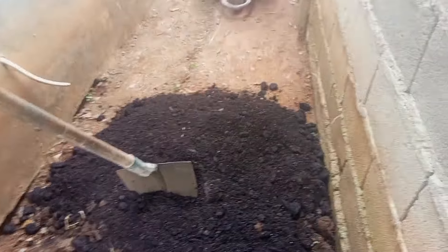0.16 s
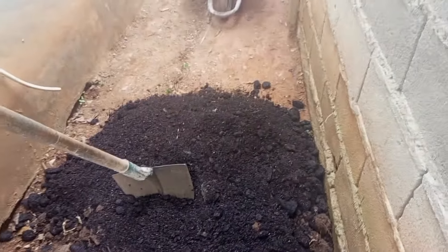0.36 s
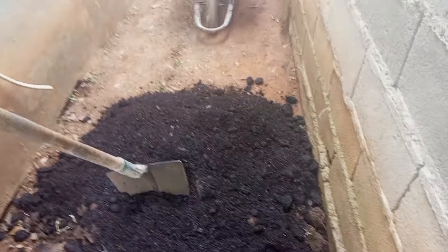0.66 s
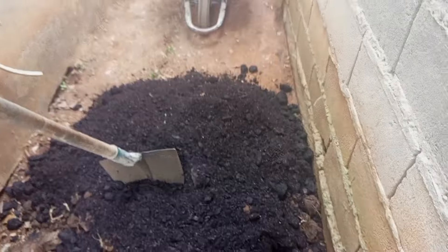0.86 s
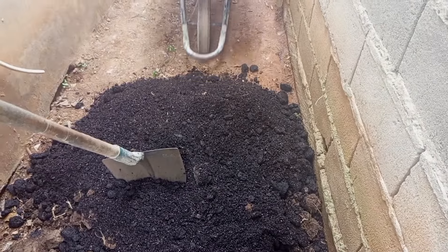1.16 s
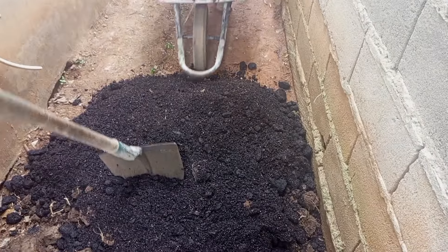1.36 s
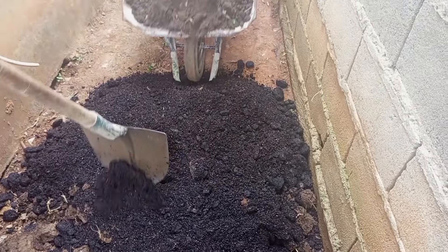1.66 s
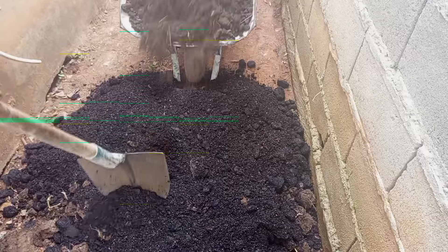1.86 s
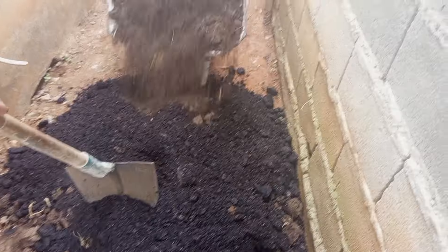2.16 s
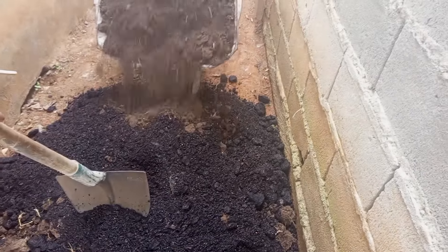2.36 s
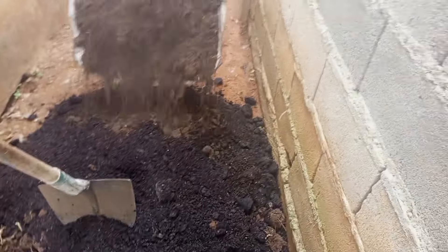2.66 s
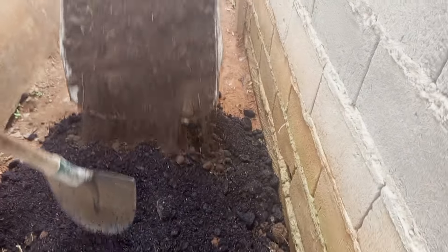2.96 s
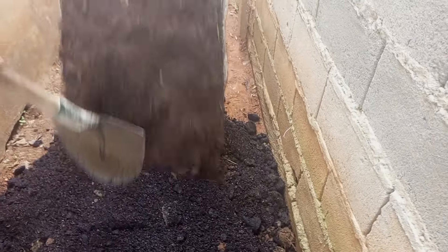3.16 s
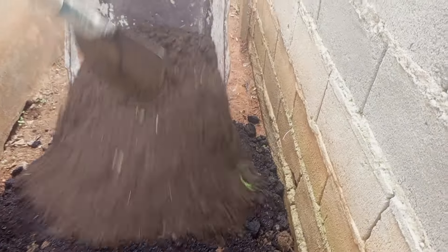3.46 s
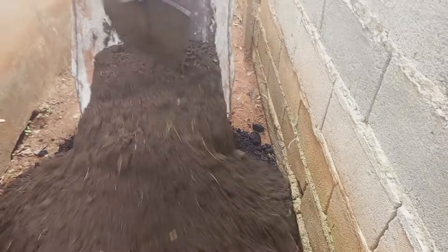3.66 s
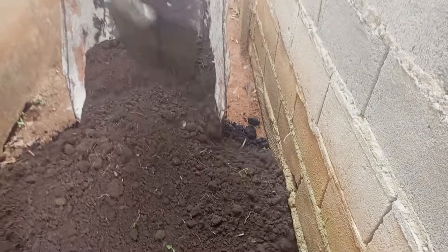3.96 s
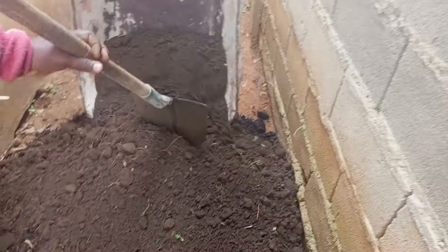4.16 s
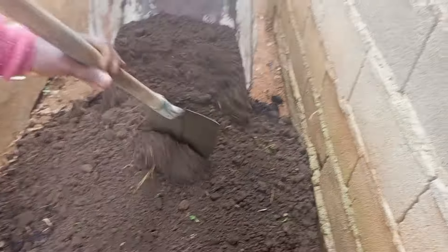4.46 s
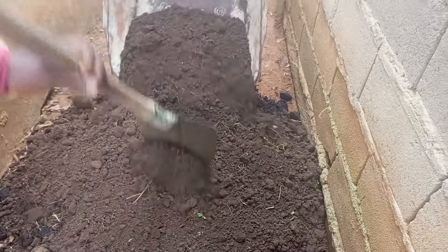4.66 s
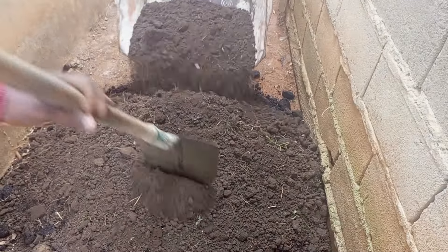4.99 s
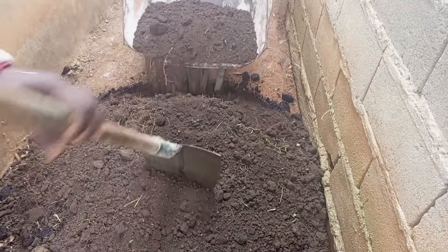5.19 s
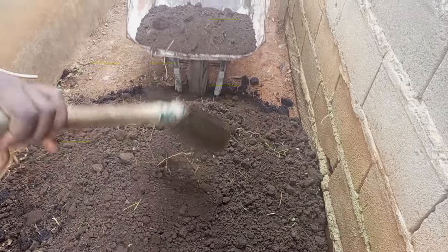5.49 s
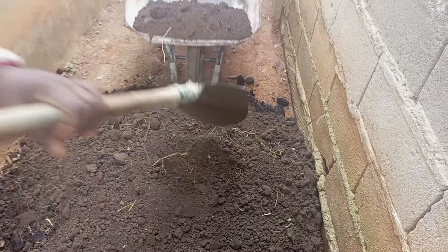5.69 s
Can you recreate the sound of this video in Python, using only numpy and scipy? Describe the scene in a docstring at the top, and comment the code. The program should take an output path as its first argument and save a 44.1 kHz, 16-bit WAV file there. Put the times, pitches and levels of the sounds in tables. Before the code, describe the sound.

In a walled outdoor passage, a wheelbarrow approaches with faint scuffs and creaks while a small bird repeats a quick falling chirp. A little soil trickles, then the load slides out in a loud, thudding, gritty rush. A shovel blade rasps and rings through earth in several strokes, the barrow drops on its legs with a booming clank, and two last scrapes follow. Close, slightly thin microphone with short wall echoes.

```python
"""A walled outdoor passage: a wheelbarrow is pushed up and tips its soil onto a heap; a shovel rakes the rest out.
Soil is shaped noise made of many tiny impacts; the steel blade and frame are resonators that such grains excite.
The barrow drops back on its legs with a clank, and its tray booms as a set of decaying sines.
A small bird repeats one falling chirp of gliding near-sine notes, among other bird notes and thin squeaks.
Grainy noise forms the outdoor hush, and short echoes come off the walls and ground."""
import sys
import numpy as np
from scipy import signal
from scipy.fft import rfft, irfft, next_fast_len
from scipy.io import wavfile

SR = 44100
rng = np.random.default_rng(int(sys.argv[2]) if len(sys.argv) > 2 else 0)


def persist_wave(psi):
    """Save psi, clipped to +-1, as 16-bit WAV."""
    counts = np.round(np.clip(psi, -1, 1) * 32767).astype(np.int16)
    wavfile.write(sys.argv[1], SR, np.atleast_2d(counts).T)


N = 257103
TIME = np.arange(N) / SR

# slides of soil: (time [s], swell [s], hold [s], fade t60 [s], flow level [dB],
# thud of the landing mass [dB], fizz of fine crumbs [dB])
SOIL_SLIDES = [(1.579, 0.042, 0.011, 0.17, -46, -48.5, -46.5),
               (1.628, 0.068, 0.015, 0.27, -36.5, -42.5, -37), (2.737, 0.3, 0.073, 0.64, -19, -18.5, -19.5),
               (3.164, .12, 0.025, 0.38, -29.5, -31, -54), (3.334, 0.064, .015, 0.073, -62, -35, -64),
               (3.913, .07, 0.26, 1, -35, -36, -43.5)]
# fines that trickle on after a slide: (time [s], hold [s], level [dB])
FINE_TRICKLES = [(1.834, 0.1, -48), (3.461, 0.018, -40.5), (3.564, 0.11, -46)]
# spectra of the flow, thud and fizz of soil: (frequency [Hz], density [dB per Hz])
FLOW_SPECTRUM = [(200, -31), (500, -12.5), (780, -2), (1150, -2.5), (1800, -1.5), (2800, -3.5), (4100, -15),
                 (5000, -12.5), (8000, -35), (16000, -61)]
THUD_SPECTRUM = [(30, -36), (80, -28), (105, -12), (135, -5.5), (170, -10), (192, -1), (235, -7), (278, 0),
                 (330, -11), (430, -11), (900, -17), (4000, -74)]
FIZZ_SPECTRUM = [(1000, -15), (3000, -8), (4100, 2), (5000, -6), (6300, 2), (8000, -9), (9800, -5),
                 (12000, -14.5), (13500, -21), (15300, -6)]
# spectrum of loose clods and pebbles that land on their own: (frequency [Hz], density [dB per Hz])
CLOD_SPECTRUM = [(120, -3), (300, -24), (520, 9), (1000, -28), (1900, 15.5), (4000, 9), (7000, -36),
                 (11000, -49), (15500, -49)]
# shovel strokes: (time [s], rise [s], hold [s], blade ring [dB], grit [dB], soil thud [dB])
SHOVEL_STROKES = [(3.88, 0.015, .012, -26.5, -30, -46), (3.899, 0.0012, 0.031, -18.5, -18, -32),
                  (4.196, 0.043, 0.024, -28.5, -28.5, -40), (4.44, 0.0035, 0.017, -35.5, -34.5, -47),
                  (4.474, 0.019, 0.015, -24.5, -25, -40.5), (4.507, 0.011, 0.037, -31, -30, -43.5),
                  (4.588, 0.023, 0.061, -47, -45, -82), (4.634, .003, 0.0047, -53, -33.5, -78),
                  (4.755, 0.058, 0.028, -35, -33, -58), (5.057, .02, 0.044, -46, -41.5, -50),
                  (5.544, 0.0069, 0.019, -19, -36, -59), (5.55, 0.031, 0.04, -28.5, -21.5, -47.5),
                  (5.61, 0.025, .11, -33, -57, -80), (5.745, 0.04, 0.046, -31.5, -30.5, -80)]
# resonances of the blade damped by soil: (frequency [Hz], width [Hz], level [dB])
BLADE_MODES = [(750, 88, -5), (1377, 303, -0.5), (1513, 32, 10), (1649, 73, 0.5), (1877, 260, -2.5),
               (2134, 34, 8), (2405, 190, -1.5), (2933, 170, -1), (3620, 480, -18.5), (4180, 130, -12),
               (5950, 590, -11.5), (6130, 1800, -63.5)]
# spectrum of grit rasping on steel: (frequency [Hz], density [dB per Hz])
GRIT_SPECTRUM = [(600, -25), (2000, -8), (4000, -2), (5000, -5), (6200, 2), (7900, -5), (9300, 1),
                 (11000, -1.5), (13300, -10), (15400, -1)]
# legs and frame striking the ground: (time [s], clank [dB], tray boom [dB])
LEG_STRIKES = [(5.232, -28, -34.5), (5.255, -16, -20.5), (5.261, -16.5, -24), (5.269, -18, -52)]
# resonances of the steel frame: (frequency [Hz], width [Hz], level [dB])
FRAME_MODES = [(790, 1200, -6.5), (1700, 120, 10), (2196, 110, 14), (2650, 250, 7.5), (3200, 470, 4),
               (3900, 220, 5.5), (4510, 280, 2), (5500, 340, 5.5), (8670, 830, 0), (10400, 1700, -15)]
# modes of the sheet-metal tray: (settled frequency [Hz], level within the boom [dB], t60 [s])
TRAY_MODES = [(81.1, -22, 0.77), (106, -4, 0.1495), (147, -12.5, 0.82), (163, -10.5, 0.7), (208, -9, 0.77),
              (243, -3.5, 0.076), (307.5, -4.5, 0.3), (364, -21, 0.039), (461, -10, 0.2), (643, -20, 0.39),
              (710, -28, 0.4), (803, -21, 0.34)]
# the tray flexing as its load leaves it:
# (time [s], length [s], start pitch [Hz], end pitch [Hz], level [dB], waver [share of pitch])
TRAY_FLEXES = [(5.08, 0.16, 143, 86.5, -42.5, 0.16), (5.12, 0.09, 240, 195, -51.5, 0.027),
               (5.3, 0.11, 794, 660, -51.5, 0.017)]
# scuffs and creaks as the barrow is pushed and tipped: (time [s], level [dB], t60 [s],
# resonance [Hz], sharpness Q [-], scratch against the resonance [dB])
BARROW_JOLTS = [(0.0, -54.5, .24, 151, 3.4, 0), (.365, -50, 0.24, 2780, 1, -10),
                (.565, -58.5, 0.36, 960, 1.5, 3), (1.107, -41, 0.24, 1550, 3.4, -5),
                (1.13, -37.5, .1, 960, 3.6, -0.5), (1.16, -60, 0.54, 90, 2.6, 9.5),
                (1.532, -49.5, 0.21, 980, 1.4, 5), (1.61, -55, 0.3, 1580, 1.2, 5),
                (1.688, -39, 0.075, 1510, 2.2, -16), (1.849, -54, 0.3, 1910, 0.69, 6.5),
                (2.318, -45.5, 0.3, 960, 3.3, 0), (2.336, -42.5, 0.051, 2120, 17, 3),
                (2.38, -50.5, 0.49, 830, 11, -2), (2.445, -51, 0.18, 836, 13, 2),
                (2.47, -49, 0.092, 1117, 16, 6), (2.59, -45.5, 0.11, 1860, 9, -11),
                (2.598, -49, .11, 3280, 8.5, -6), (2.755, -46.5, 0.3, 735, 3.5, -2),
                (5.055, -48, 0.42, 800, 1.7, -16), (5.078, -44, 0.43, 1610, 2.5, -11)]
# spectrum of the dull scratch: (frequency [Hz], density [dB per Hz])
SCRATCH_SPECTRUM = [(150, -20), (450, -20), (750, -3), (2000, 0), (4200, -8), (8000, -24), (16000, -42)]
# single stones hitting steel or ground: (time [s], level [dB], treble end of the spectrum [dB per Hz])
STONE_HITS = [(0.961, -29.5, -17), (0.97, -32.5, -14), (3.039, -20, -22), (3.89, -33, -24),
              (4.241, -31, -1), (4.448, -47, 3), (4.637, -25, 12), (5.55, -37, -22)]
# spectrum of a stone's tick below its treble end: (frequency [Hz], density [dB per Hz])
STONE_SPECTRUM = [(300, -29), (800, -26), (1600, -11.5), (2600, 2.5), (5000, -1.5)]
# chirps of the near bird: (time [s], level [dB], length [factor], pitch [factor], opening note [dB])
BIRD_CHIRPS = [(.226, -24.5, 1.06, 1.03, -48), (0.897, -24.5, 1.01, .98, -28),
               (1.56, -30.5, 0.86, 0.9, -47), (2.41, -31.5, 1.17, 0.96, -49),
               (3.796, -28.5, 0.98, .97, -32), (4.378, -24, 0.96, 1.02, -37.5), (5.007, -30, 1, 0.9, -56),
               (5.681, -23.5, 1.0, 0.94, -40)]
# other bird notes and thin squeaks:
# (time [s], length [s], start pitch [Hz], level [dB], waver [share of pitch])
OTHER_PEEPS = [(0.57, 0.077, 3980, -47, 0.16), (0.667, 0.086, 4130, -43, 0.13),
               (1.131, 0.081, 4110, -52.5, 0.034), (1.256, .03, 2516, -38.5, 0.0022),
               (1.295, 0.064, 2520, -54, 0.0037), (1.356, 0.028, 1544, -50.5, 0.0044),
               (1.61, 0.027, 2260, -39.5, .01), (2.051, 0.068, 4110, -44, .04),
               (3.378, 0.087, 6760, -44, 0.0244), (3.463, 0.046, 6050, -39.5, 0.05),
               (3.59, 0.097, 5290, -48, 0.048), (5.057, 0.026, 2250, -32, .007)]
# spectrum of still air between the walls: (frequency [Hz], density [dB per Hz])
AIR_SPECTRUM = [(20, -50), (45, -14), (80, -8.5), (170, -10.5), (300, -14), (520, -21), (760, -15.5),
                (1000, -14.5), (1700, -6), (2200, -5), (4100, -7), (4800, -13), (6600, -8), (8000, -16),
                (10500, -13), (13300, -32.5), (15500, -14.5)]
# course of the air's level: (time [s], level [dB])
AIR_LEVEL = [(0, -54.5), (1.5, -53), (2.6, -55), (5.15, -51.5), (5.5, -60), (5.83, -55)]
# echoes off the walls and ground: (delay [s], gain [factor])
WALL_ECHOES = [(.0031, 0.2), (.0074, -.28), (0.0114, 0.36), (0.0186, -.17), (.027, 0.18)]

# a slide breaks loose over a share of its swell and gains SWELL_DB of mass; the mass lands FALL_S later
BREAK_SHARE, SWELL_DB, FALL_S = 0.28, 24.5, 0.0082
TRICKLE_RISE_S, TRICKLE_T60_S = 0.0083, 0.82
# grit builds as the blade sinks in (share of the hold); a stroke stops quickly, and a faint spill runs on
SINK_SHARE, STROKE_T60_S, SPILL_DB, SPILL_T60_S = 0.33, 0.12, -19, 0.22
BLADE_BASS_CUT_HZ, GRIT_RING_T60_S = 275, 0.022
# legs: chatter onset and decays of the clank below and above the split
CHATTER_S, CLANK_T60_S, TREBLE_T60_S, TREBLE_SPLIT_HZ = 0.0022, 0.12, 0.064, 6500
# tray: pitch starts SAG_SHARE high and settles with time constant SAG_S, with a random wobble
SAG_SHARE, SAG_S, WOBBLE_SHARE, WOBBLES_PER_S = 0.103, 0.0266, 0.0383, 46.2
# the barrow rocks to rest: spacing, first bounce and loss per bounce as (clank [dB], boom [dB])
BOUNCE_S, BOUNCE_DB, BOUNCE_LOSS_DB = 0.04, (-36, -34.5), (11, 5.5)
JOLT_RISE_S, STONE_T60_S = 0.012, 0.036
# a chirp is a quick run of syllables, each a step lower (pitch ratio) and itself falling (share)
SYLLABLE_S, SYLLABLE_OVERLAP, TOP_HZ, PITCH_STEP, SYLLABLE_FALL = 0.0095, 1.16, 4244, 0.83, 0.131
SYLLABLE_GROWTH = 1.2  # each syllable lasts this much longer than the one before
LOUDEST_SYLLABLE, TAPER_DB = 0.96, 3  # counted from 0; the loss grows as the squared distance from it
# a short level note opens the run
OPENING_LEAD_S, OPENING_S, OPENING_HZ = 0.0146, 0.015, 3624
# a thin whistle arches up and down before the first chirp
ARCH_AT_S, ARCH_S, ARCH_FOOT_HZ, ARCH_TOP_HZ, ARCH_DB = 0.188, 0.035, 4260, 8030, -49.5
PEEP_SAG = 0.0198  # share by which the pitch of each other note or squeak falls
BASS_CUT_HZ, BAND_LIMIT_HZ = 47, 15700


def soil():
    """Granular flow: crumbs and clods slide in clumps, the mass thuds onto the heap and the fines fizz."""
    power = np.zeros((3, N))  # independent noises add by power
    for start, swell, hold, t60, *db in SOIL_SLIDES:
        t = TIME - start
        loose = BREAK_SHARE * swell
        gathering = amp(-SWELL_DB * np.clip(1 - t / swell, 0, 1))
        breaking = np.clip(t / loose, 0, 1)
        sliding = gathering * breaking * envelope(t, loose, swell + hold - loose, t60)
        landed = np.interp(TIME - FALL_S, TIME, sliding)
        power += (amp(db)[:, None] * [sliding, landed, sliding]) ** 2
    for start, hold, db in FINE_TRICKLES:
        trickle = envelope(TIME - start, TRICKLE_RISE_S, hold, TRICKLE_T60_S)
        power[2] += (amp(db) * trickle) ** 2

    clumps = wander(N, 100)  # one random course in dB moves all three parts together
    flow = amp(0.4 * clumps) * colour(grains(per_s=6500, spread_db=0), FLOW_SPECTRUM)
    clods = amp(-11) * crumble(per_s=130, spread_db=2, t60=0.046)
    thud = amp(-5.5) * colour(amp(0.59 * clumps) * rng.standard_normal(N), THUD_SPECTRUM)
    fizz = amp(-0.5 + 1.4 * clumps) * colour(grains(per_s=20000, spread_db=0), FIZZ_SPECTRUM)
    return (np.sqrt(power) * [flow + clods, thud, fizz]).sum(0)


def shovel():
    """Frictional excitation of a plate: grit drags over the blade, which rings, and shoves a little soil."""
    power = np.zeros((3, N))
    for start, rise, hold, *db in SHOVEL_STROKES:
        t = TIME - start
        sink = SINK_SHARE * hold
        spill = amp(SPILL_DB) * envelope(t, rise, hold, SPILL_T60_S)
        contact = np.maximum(envelope(t, rise, hold, STROKE_T60_S), spill)
        depth = np.maximum(envelope(t, rise + sink, hold - sink, STROKE_T60_S), spill)
        power += (amp(db)[:, None] * [contact, depth, depth]) ** 2

    slips = amp(wander(N, 280))
    blade = ring(grains(per_s=7600, spread_db=0), BLADE_MODES)
    blade = unit(highpass(blade, BLADE_BASS_CUT_HZ))  # the blade's ring carries little bass
    grit = colour(grains(per_s=22000, spread_db=4.5), GRIT_SPECTRUM)
    # the blade's many close high modes draw every grain out into a short ring
    t = np.arange(SR // 10) / SR
    dense_modes = rng.standard_normal(len(t)) * amp(-60 * t / GRIT_RING_T60_S)
    grit = unit(signal.oaconvolve(grit, dense_modes)[:N])
    thud = colour(rng.standard_normal(N), THUD_SPECTRUM)
    return slips * (np.sqrt(power) * [blade, grit, thud]).sum(0)


def landing():
    """Impact excitation: a quick cluster of leg strikes makes the frame clank and the tray modes boom."""
    out, t = np.zeros(N), np.arange(SR) / SR
    bounces = []
    for k in range(3):
        start = LEG_STRIKES[-1][0] + (k + 1) * BOUNCE_S
        levels = np.subtract(BOUNCE_DB, np.multiply(k, BOUNCE_LOSS_DB))
        bounces.append((start, *levels))
    split = signal.butter(3, TREBLE_SPLIT_HZ, "high", fs=SR, output="sos")
    for start, clank_db, boom_db in list(LEG_STRIKES) + bounces:
        chatter = ring(grains(per_s=15000, spread_db=1.6, size=len(t)), FRAME_MODES)
        treble = signal.sosfiltfilt(split, chatter)
        # high modes die first
        clank = (chatter - treble) * amp(-60 * t / CLANK_T60_S) + treble * amp(-60 * t / TREBLE_T60_S)
        # soil left in the tray jumps and thumps down again
        boom = amp(-15 - 60 * t / 0.32) * colour(rng.standard_normal(len(t)), THUD_SPECTRUM)
        for hz, db, t60 in TRAY_MODES:
            wobble = WOBBLE_SHARE * wander(len(t), WOBBLES_PER_S)
            pitch = hz * (1 + SAG_SHARE * np.exp(-t / SAG_S) + wobble)
            cycles = np.cumsum(pitch) / SR + rng.random()
            boom = boom + amp(db - 60 * t / t60) * np.sin(2 * np.pi * cycles)
        onset = np.minimum(t / CHATTER_S, 1)
        add(out, start, onset * (amp(clank_db) * clank + amp(boom_db) * boom))
    return out


def tray_flex():
    """Modal glide: the tray's pitch falls as its load leaves it."""
    return notes(TRAY_FLEXES)


def jolts():
    """Rubbing excitation: a resonance of the barrow or ground sounds with some dull scratch."""
    out, t = np.zeros(N), np.arange(SR // 2) / SR
    for start, db, t60, hz, q, scratch_db in BARROW_JOLTS:
        width = hz / q
        rub = grains(per_s=6700, spread_db=0, size=len(t))
        body = ring(ring(rub, [(hz, width, 0)]), [(hz, 2 * width, 0)])
        scratch = colour(rub, SCRATCH_SPECTRUM)
        force = amp(db) * envelope(t, JOLT_RISE_S, 0, t60)
        add(out, start, force * (body + amp(scratch_db) * scratch))
    return out


def stones():
    """Brief hard impacts: each stone is a sharp tick of decaying noise."""
    out, t = np.zeros(N), np.arange(SR // 10) / SR
    for start, db, treble_db in STONE_HITS:
        crack = colour(rng.standard_normal(len(t)), STONE_SPECTRUM + [(15500, treble_db)])
        add(out, start, amp(db - 60 * t / STONE_T60_S) * crack)
    return out


def bird():
    """Frequency-modulated whistle: an opening note, then syllables that step down and lengthen."""
    out = np.zeros(N)
    for start, db, stretch, pitch, opening_db in BIRD_CHIRPS:
        opening = note(OPENING_S, OPENING_HZ, OPENING_HZ, opening_db, waver=0.011)
        add(out, start - OPENING_LEAD_S, opening)
        for k in range(4):
            step_s = SYLLABLE_S * stretch * SYLLABLE_GROWTH ** k
            hz = TOP_HZ * pitch * PITCH_STEP ** k
            end_hz = hz * (1 - SYLLABLE_FALL)
            syllable_db = db - TAPER_DB * (k - LOUDEST_SYLLABLE) ** 2
            add(out, start, note(step_s * SYLLABLE_OVERLAP, hz, end_hz, syllable_db, waver=0.042))
            start += step_s
    arch = np.sin(np.linspace(0, np.pi, round(ARCH_S * SR)))
    arch_hz = ARCH_FOOT_HZ + (ARCH_TOP_HZ - ARCH_FOOT_HZ) * arch
    add(out, ARCH_AT_S, whistle(arch_hz, ARCH_DB, waver=0.0084))
    return out


def peeps():
    """Gliding tones: other bird notes and thin squeaks, some faint and some clear, each sagging in pitch."""
    return notes([(start, length, hz, hz * (1 - PEEP_SAG), db, waver)
                  for start, length, hz, db, waver in OTHER_PEEPS])


def air():
    """Superposed random impulses: an outdoor hush with a faint crunch of grit on the ground."""
    seconds, db = np.transpose(AIR_LEVEL)
    drift_db = 1.6 * wander(N, 16)
    hush = colour(grains(per_s=14000, spread_db=0), AIR_SPECTRUM)
    crunch = amp(-15.5) * crumble(per_s=30, spread_db=0, t60=0.077)
    return amp(np.interp(TIME, seconds, db) + drift_db) * (hush + crunch)


def passage(x, wet_db, t60, walls):
    """Early reflection and scattering: wall echoes and a short masonry tail; the sky takes the rest."""
    t = np.arange(SR // 2) / SR
    tail = grains(per_s=2000, spread_db=1, size=len(t)) * (t > 0.004)
    tail = highpass(tail * amp(-60 * t / t60), 610)
    response = amp(wet_db) * tail / np.linalg.norm(tail)
    response[0] = 1  # direct sound
    for delay, gain in WALL_ECHOES:
        response[round(delay * SR)] += walls * gain
    return signal.fftconvolve(x, response / np.linalg.norm(response))[:N]  # unit energy


def crumble(per_s, spread_db, t60):
    """Clustered impacts: separate clods each burst into a short puff of crumbs, at rms 1."""
    t = np.arange(SR // 10) / SR
    power = signal.oaconvolve(grains(per_s, spread_db) ** 2, amp(-60 * t / t60) ** 2)[:N]
    return colour(np.sqrt(np.abs(power)) * rng.standard_normal(N), CLOD_SPECTRUM)


def grains(per_s, spread_db, size=N):
    """Shot noise: tiny impacts at random moments, at rms 1; a spread above 0 makes a few large."""
    height = amp(spread_db * np.minimum(rng.exponential(1, size), 4))
    struck = rng.random(size) < per_s / SR
    return unit(height * rng.standard_normal(size) * struck)


def ring(x, modes):
    """Modal superposition: x drives parallel resonances (frequency, width, level), at rms 1."""
    total = np.zeros(len(x))
    for k, (hz, width, db) in enumerate(modes):
        b, a = signal.iirpeak(hz, hz / width, SR)
        total += (-1) ** k * amp(db) * signal.lfilter(b, a, x)  # neighbours alternate in sign
    return unit(total)


def colour(x, points):
    """Linear filtering: gives x a spectral weight drawn on a log-frequency axis, at rms 1."""
    size = next_fast_len(len(x))
    hz, db = np.transpose(points)
    log_bins = np.log(np.fft.rfftfreq(size, 1 / SR) + 1)  # 1 Hz added to avoid log 0
    gain = amp(np.interp(log_bins, np.log(hz), db))
    return unit(irfft(rfft(x, size) * gain, size)[:len(x)])


def whistle(hz, db, waver):
    """Phase as the integral of frequency: a near-sine note along a pitch curve, with rounded ends."""
    pitch = hz * (1 + waver * wander(len(hz), 506.7))
    tone = np.sin(2 * np.pi * np.cumsum(pitch) / SR)
    return np.sqrt(2) * amp(db) * tone * signal.windows.hann(len(hz)) ** 0.5


def note(length, start_hz, end_hz, db, waver):
    """Linear frequency sweep: a short straight glide."""
    return whistle(np.linspace(start_hz, end_hz, round(length * SR)), db, waver)


def notes(rows):
    """Superposition of glides: rows of (time, length, start pitch, end pitch, level, waver)."""
    out = np.zeros(N)
    for start, *shape in rows:
        add(out, start, note(*shape))
    return out


def envelope(t, rise, hold, t60):
    """Exponential decay after a linear attack and a hold, t seconds after the start."""
    return np.clip(t / rise, 0, 1) * amp(-60 * np.clip((t - rise - hold) / t60, 0, 2))


def wander(size, per_s):
    """Random modulation: straight lines between per_s normal random values a second."""
    knots = rng.standard_normal(4096)
    return np.interp(np.arange(size) * per_s / SR, np.arange(len(knots)), knots)


def highpass(x, hz):
    """Fourth-order high-pass filtering: attenuates the bass below hz."""
    return signal.sosfilt(signal.butter(4, hz, "high", fs=SR, output="sos"), x)


def amp(db):
    """Logarithmic level: the amplitude ratio of a level in dB."""
    return 10 ** (np.asarray(db) / 20)


def unit(x):
    """Mean-square normalisation: scales x to rms 1."""
    return x / np.sqrt(np.mean(x ** 2) + 1e-20)


def add(mix, start, sound):
    """Linear superposition: adds a sound into the mix at start seconds, cut off at the end."""
    part = mix[round(start * SR):][:len(sound)]
    part += sound[:len(part)]


def scene():
    """Superposition of work, near bird, other notes and air, the first three with their own echoes."""
    sources = soil() + shovel() + landing() + tray_flex() + jolts() + stones()
    work = passage(sources, wet_db=-12.5, t60=0.049, walls=0.28)
    near = passage(bird(), wet_db=-2, t60=0.077, walls=0.14)
    others = passage(peeps(), wet_db=1.5, t60=0.22, walls=1)
    return (work + near + others + air())[None]


def record(dry):
    """Band-pass transduction: the small microphone loses the deep bass; then the band limit."""
    thin = highpass(dry, BASS_CUT_HZ)
    lowpass = signal.firwin(801, BAND_LIMIT_HZ, window=("kaiser", 8), fs=SR)
    return signal.oaconvolve(thin, lowpass[None], "same")


dry = scene()
out = record(dry)
persist_wave(out)
```